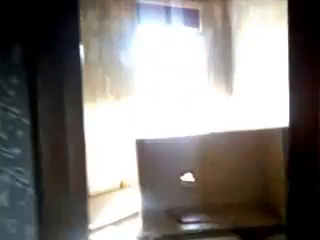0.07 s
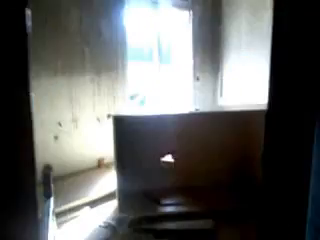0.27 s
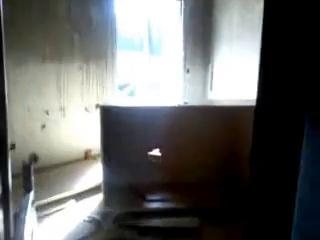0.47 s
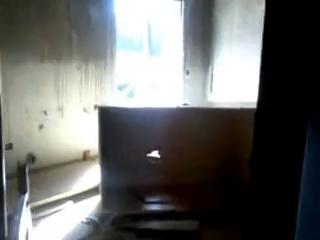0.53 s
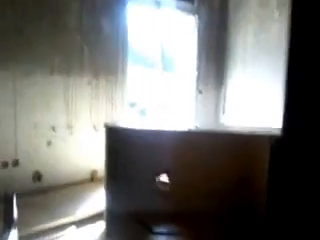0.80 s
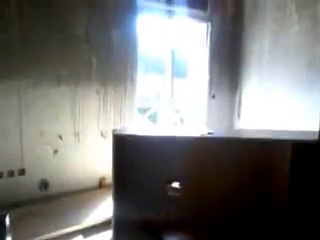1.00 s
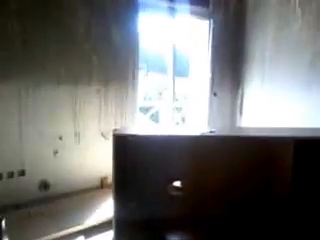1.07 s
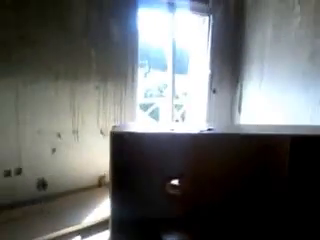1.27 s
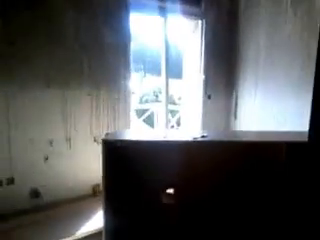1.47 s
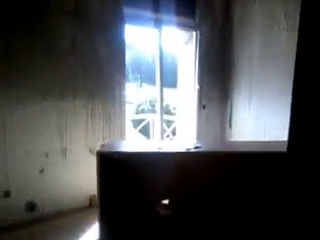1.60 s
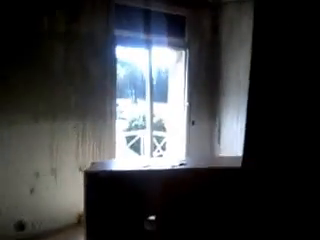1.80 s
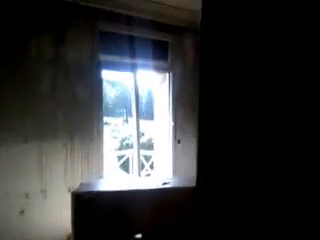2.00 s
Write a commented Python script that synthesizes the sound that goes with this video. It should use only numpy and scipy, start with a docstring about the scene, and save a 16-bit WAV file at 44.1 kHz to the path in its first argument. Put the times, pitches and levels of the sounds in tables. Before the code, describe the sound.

Masonry gives way with a crash, slides, then crashes harder, with cracking pieces, heavy knocks and booming loose panels. It is heard through a doorway from a bare room, on a small, dull microphone that overloads.

```python
"""Falling masonry, heard through a doorway from a bare room: it gives way, slides, then crashes harder.
Each fall is a shower of tiny impacts, with hard pieces cracking and heavy lumps knocking on top.
Loose panels boom under the rubble, an edge scrapes as the heap settles, and demolition work rumbles
further off. A small narrow-band microphone overloads on the loudest bangs."""
import sys
import numpy as np
from scipy import signal
from scipy.fft import rfft, irfft, next_fast_len
from scipy.io import wavfile

SR = 44100
rng = np.random.default_rng(int(sys.argv[2]) if len(sys.argv) > 2 else 0)


def int16_out(signal):
    """Quantize to a 16-bit WAV file."""
    q = np.round(np.clip(np.atleast_2d(signal).T, -1, 1) * 32767)
    wavfile.write(sys.argv[1], SR, q.astype(np.int16))


N = 90404

# tone of the distant work: f/Hz, relative level/dB
WORK_EQ = [(25, -43), (60, -30.5), (150, -17.5), (230, -7), (320, -1), (480, -10.5), (620, -7),
           (900, -13.5), (1400, -12), (2000, -10.5), (2700, -22), (3300, -23), (4000, -35), (4800, -32.5)]
# rubble showers: start/s, rise/s, hold/s, t60/s, then level/dB of rumble, body, knock, clatter, grit
RUBBLE_FALLS = [(0.033, 0.023, 0.14, 1, -15.5, -12, -13, -15.5, -13),
                (0.223, 0.025, 0.14, 0.86, 1, 0.5, 1.5, 2, 1.5),
                (0.487, 0.042, 0.18, 0.59, -7, -8.5, -11, -11.5, -14),
                (0.687, 0.011, 0.091, 1, -9, -6, -22, -7, -5),
                (0.781, 0.025, 0.11, .7, -9.5, -10, -8.5, -10.5, -14.5),
                (0.909, 0.036, 0.23, 0.46, -3, -3, -3.5, -1, 1.5),
                (1.131, 0.0073, 0.13, 0.84, 4, 5.5, 7, 10, 5.5),
                (1.339, 0.023, 0.082, 0.82, 7, 8.5, 6.5, 6.5, 2.5),
                (1.575, 0.046, 0.095, 0.45, -7, 3, -7.5, -13, -9.5),
                (2.015, 0.0045, 0.011, 0.19, -23, -43, -53, -13, -13)]
# centres of those five bands: f/Hz
FALL_BANDS = [120, 300, 650, 1300, 2500]
# tone of broken masonry: f/Hz, relative level/dB
MASONRY_EQ = [(25, -40.5), (45, -27.5), (70, -13), (120, -12.5), (200, -7), (250, 0), (400, 0), (600, -0.5),
              (850, -4), (1300, -8.5), (1850, -5.5), (2500, -10), (3300, -15.5), (4000, -27), (4800, -23)]
# hard pieces cracking: t/s, level/dB, f/Hz
CRACK_HITS = [(.147, -30.5, 1910), (0.271, -17, 1000), (.322, -20.5, 2300), (.386, -22.5, 2450),
              (0.489, -25.5, 3000), (0.735, -29, 2500), (.848, -24, 1500), (.968, -21.5, 1900),
              (1.047, -23, 2000), (1.146, -17, 1500), (1.222, -8.5, 1850), (1.314, -23, 2000),
              (1.378, -15, 1900), (1.511, -19.5, 1900), (1.645, -26.5, 3200), (1.75, -33, 1800),
              (1.885, -39, 2600)]
# heavy lumps landing: t/s, level/dB, f/Hz
LUMP_HITS = [(.272, -9.5, 538), (.303, -7, 342.5), (.378, -9, 370), (.43, -16.5, 340), (.513, -9.5, 372),
             (.655, -18, 467), (.692, -20.5, 188.6), (.74, -24.5, 158.5), (1.045, -12, 250),
             (1.143, -15, 168.5), (1.141, -10.5, 514.5), (1.162, -7.5, 257), (1.178, -7, 525.4),
             (1.178, -27.5, 69.4), (1.228, -6.5, 587), (1.265, -6, 462), (1.293, -8, 410), (1.325, -9, 608),
             (1.398, -12.5, 286), (1.418, -5, 429), (1.453, -22, 74.8), (1.448, -7.5, 263),
             (1.49, -14, 318), (1.576, -9, 340), (1.71, -18.5, 300), (1.784, -20.5, 262)]
# resonances of two loose panels and a scraping edge: f/Hz, half-width/Hz, relative level/dB
LARGE_PANEL_MODES = [(244.2, 6.3, -2), (381.3, 16, -5)]
SMALL_PANEL_MODES = [(262.7, 11, -3.2), (416.6, 10, 0), (576.2, 13, 1)]
EDGE_MODES = [(1966, 140, 5.5), (2540, 420, -8.5), (2870, 140, -16.5), (4200, 200, -20.5)]
# when each panel shakes and the edge drags: start/s, rise/s, hold/s, t60/s, level/dB
LARGE_PANEL_SWELLS = [(.34, .06, 0.18, 0.69, -20)]
SMALL_PANEL_SWELLS = [(1.21, 0.068, 0.057, 0.22, -14.5), (1.39, 0.036, 0.023, 0.66, -14.5)]
EDGE_SWELLS = [(1.18, 0.036, 0.024, 0.13, -20), (1.56, 0.018, 0.086, 0.43, -22.5)]
# decay of the bare room: f/Hz, t60/s
ROOM_DECAY = [(100, 0.46), (400, 0.76), (1500, 0.18), (4000, 0.21)]
# microphone's treble roll-off: f/Hz, level/dB
MIC_EQ = [(20, 0), (3250, 0), (3750, -8), (4300, -12), (5000, -18.5)]


def amp(db):
    """Decibels to gain."""
    return 10 ** (np.asarray(db) / 20)


def unit(x):
    """Scales to rms 1."""
    return x / np.sqrt(np.mean(x ** 2) + 1e-20)


def curve_at(points, hz):
    """Reads a curve on a log-frequency axis."""
    f, value = np.transpose(points)
    return np.interp(np.log(hz + 1), np.log(f + 1), value)


def equalise(x, points):
    """Applies an EQ curve of f/Hz, level/dB."""
    size = next_fast_len(N + 4096)
    gain = amp(curve_at(points, np.fft.rfftfreq(size, 1 / SR)))
    return irfft(rfft(x, size) * gain, size)[:N]


def lowpass(x, hz):
    """Steep high cut."""
    return signal.oaconvolve(x, signal.firwin(401, hz, window=("kaiser", 9), fs=SR), "same")


def envelope(start, rise, hold, t60):
    """Linear attack, hold and exponential release."""
    t = np.arange(N) / SR - start
    return np.clip(t / rise, 0, 1) * amp(-60 * np.maximum(t - rise - hold, 0) / t60)


def swells(rows):
    """Sums a list of swells into one gain curve."""
    return sum(amp(db) * envelope(start, rise, hold, t60) for start, rise, hold, t60, db in rows)


def strike(rise_s, t60_s):
    """Time axis and envelope of one short hit."""
    t = np.arange(SR // 4) / SR
    return t, np.minimum(t / rise_s, 1) * amp(-60 * np.maximum(t - rise_s, 0) / t60_s)


def add(mix, start, sound):
    """Drops a sound into the mix at its start time."""
    part = mix[max(round(start * SR), 0):][:len(sound)]
    part += sound[:len(part)]


def fragments(per_s=2600, spread_db=3):
    """A rain of clicks of random polarity, most small and a few large."""
    hit = rng.random(N) < per_s / SR
    size = np.minimum(rng.exponential(1, N), 4)
    sign = rng.choice([-1, 1], N)
    return unit(hit * sign * amp(spread_db * size))


def ringing(modes, steadiness):
    """Resonances kept going by a rain of small impacts; steadiness evens out their beating."""
    size = next_fast_len(N)
    hz, out = np.fft.rfftfreq(size, 1 / SR), np.zeros(N)
    drive = rfft(fragments(), size)
    for f, half_width, db in modes:
        ring = np.fft.ifft(drive / (1 + 1j * (hz - f) / half_width) ** 2, size)[:N]
        beating = abs(ring) + 1e-12
        out += amp(db) * unit(ring.real / beating ** steadiness)
    return unit(out)


def room(x, wet):
    """Adds dense reflections from bare walls, each band dying at its own speed."""
    count, predelay, spacing = 900, 180, 22  # predelay and spacing in samples
    arrivals = predelay + spacing * np.arange(count)
    taps = np.zeros(SR // 2)
    taps[arrivals + rng.integers(0, spacing, count)] = rng.choice([-1., 1.], count)
    hz, t, spectrum = signal.stft(taps, SR, nperseg=256)
    decay = amp(-60 * t / curve_at(ROOM_DECAY, hz)[:, None])
    tail = signal.istft(spectrum * decay, SR, nperseg=256)[1]
    reverb = signal.fftconvolve(x, tail / np.linalg.norm(tail))[:N]
    return (x + wet * reverb) / np.hypot(1, wet)


def distant_work():
    """Far-off impacts blur into a steady bed of rumble and trickle."""
    return amp(-33.5) * unit(equalise(fragments(per_s=3000, spread_db=2), WORK_EQ))


def rubble():
    """Showers of fragments, each with its own blend of heavy and fine pieces and its own room tail."""
    out = np.zeros(N)
    for start, rise, hold, t60, *band_db in RUBBLE_FALLS:
        shower = unit(equalise(fragments(), MASONRY_EQ))
        shower = equalise(shower, list(zip(FALL_BANDS, band_db)))
        out += room(envelope(start, rise, hold, t60) * shower, wet=0.37)
    return amp(-17) * out


def cracks():
    """Each hard piece snaps with a brief burst of noise in one broad resonance."""
    out = np.zeros(N)
    t, shape = strike(rise_s=0.0071, t60_s=0.11)
    f = np.fft.rfftfreq(len(t), 1 / SR)
    for start, db, hz in CRACK_HITS:
        half_width = 0.25 * hz
        resonance = 1 / (1 + ((f - hz) / half_width) ** 2)
        burst = irfft(rfft(rng.standard_normal(len(t))) * resonance, len(t))
        add(out, start, amp(db) * shape * unit(burst))
    return out


def lumps():
    """Each heavy lump lands with a short, hollow knock: one fast-dying sine."""
    out = np.zeros(N)
    t, shape = strike(rise_s=0.0072, t60_s=0.072)
    for start, db, hz in LUMP_HITS:
        add(out, start, amp(db) * shape * np.sin(2 * np.pi * (hz * t + rng.random())))
    return out


def panels():
    """Loose panels boom while rubble pours on them, the large one first."""
    large = swells(LARGE_PANEL_SWELLS) * ringing(LARGE_PANEL_MODES, steadiness=0.7)
    small = swells(SMALL_PANEL_SWELLS) * ringing(SMALL_PANEL_MODES, steadiness=0.8)
    return large + small


def scrapes():
    """A hard edge drags twice with a rough squeal."""
    return swells(EDGE_SWELLS) * ringing(EDGE_MODES, steadiness=0.3)


def scene():
    """Mono mix: rubble, hits and scrapes carry the room; the panels and the distant bed stay dry."""
    collapse = rubble() + room(lumps() + cracks() + scrapes(), wet=0.31)
    return (collapse + panels() + distant_work())[None]


def record(dry):
    """The microphone saturates softly and loses its treble; the highest peaks clip."""
    soft_ceiling, hard_ceiling = 1.4, 0.99
    saturated = soft_ceiling * np.tanh(dry[0] / soft_ceiling)
    narrow = lowpass(equalise(saturated, MIC_EQ), hz=4950)
    clipped = np.clip(narrow, -hard_ceiling, hard_ceiling)
    return lowpass(clipped, hz=16000)[None]


dry = scene()
out = record(dry)
int16_out(out)
```